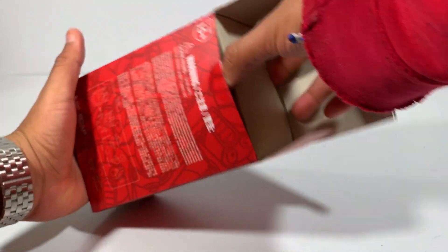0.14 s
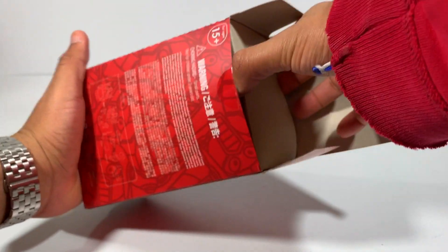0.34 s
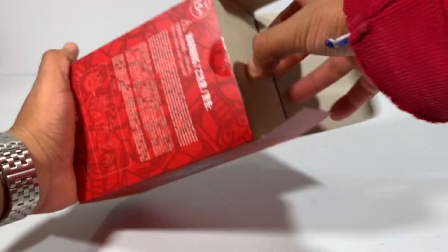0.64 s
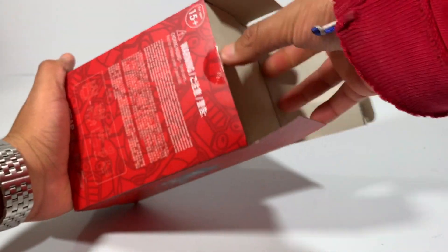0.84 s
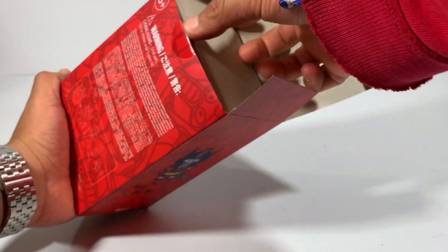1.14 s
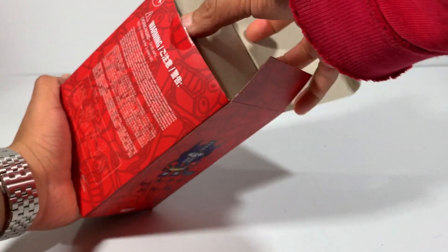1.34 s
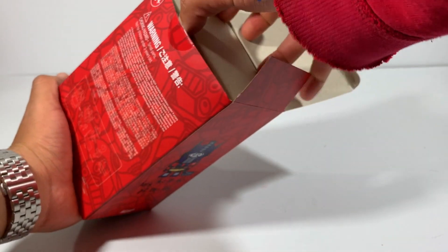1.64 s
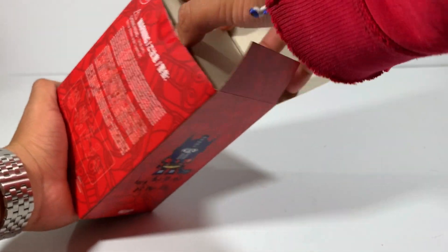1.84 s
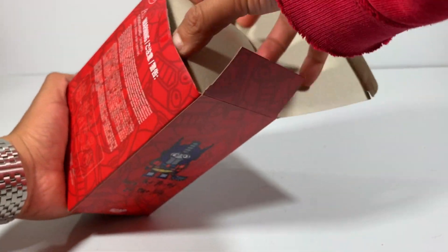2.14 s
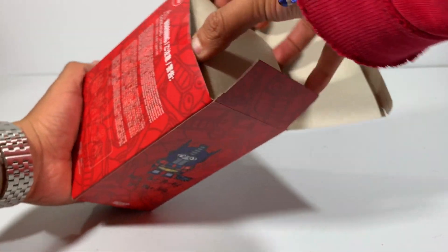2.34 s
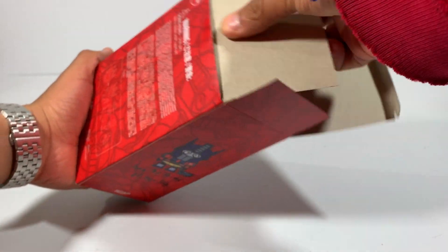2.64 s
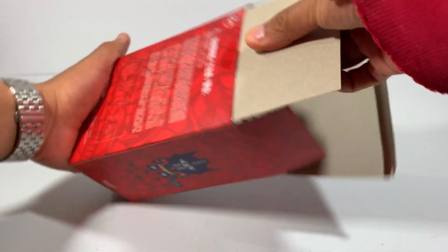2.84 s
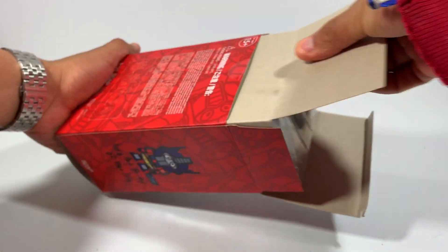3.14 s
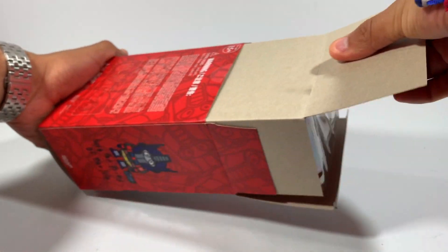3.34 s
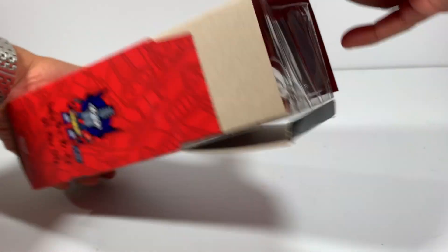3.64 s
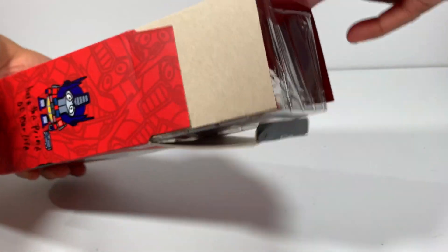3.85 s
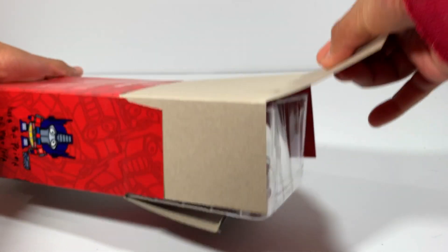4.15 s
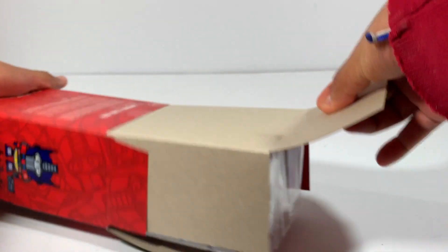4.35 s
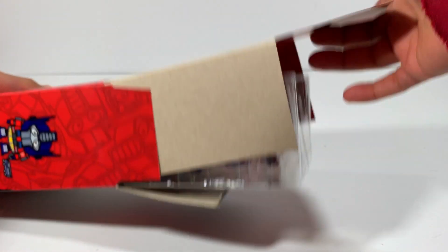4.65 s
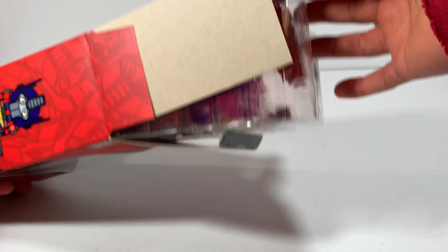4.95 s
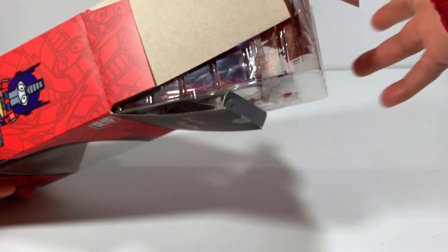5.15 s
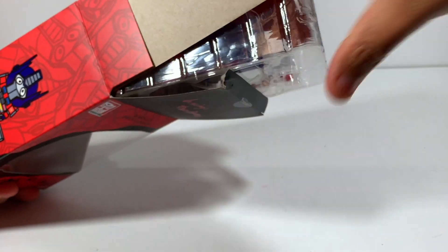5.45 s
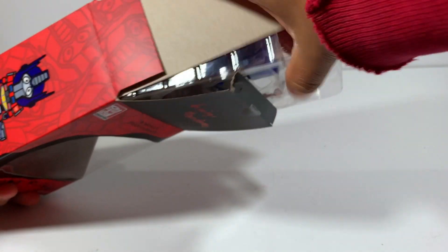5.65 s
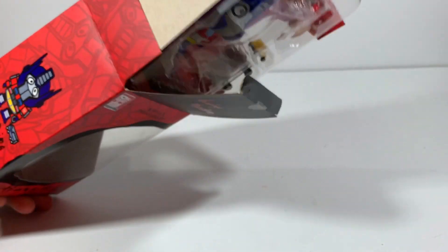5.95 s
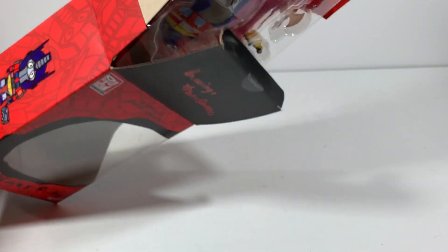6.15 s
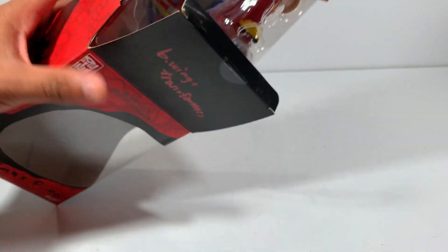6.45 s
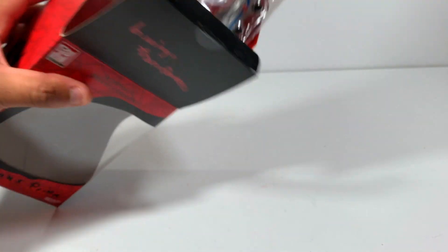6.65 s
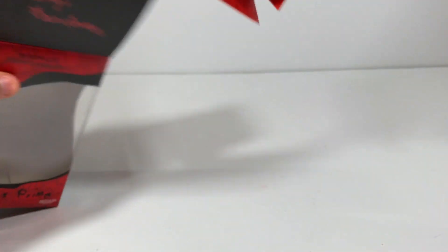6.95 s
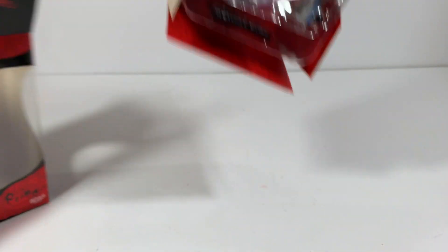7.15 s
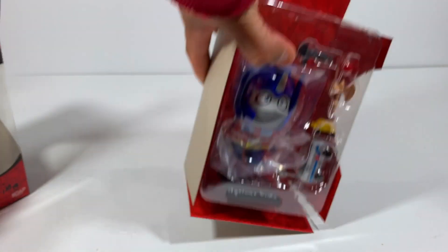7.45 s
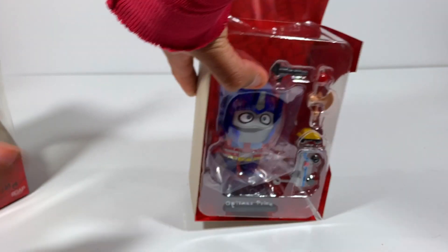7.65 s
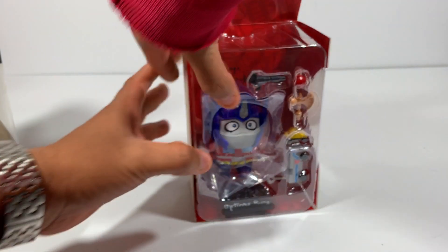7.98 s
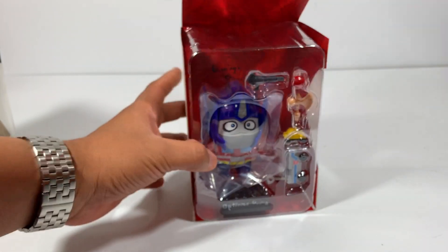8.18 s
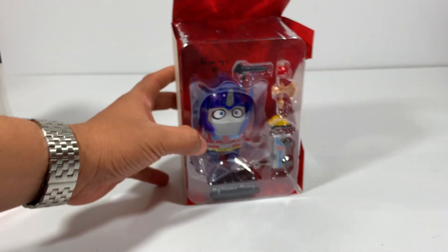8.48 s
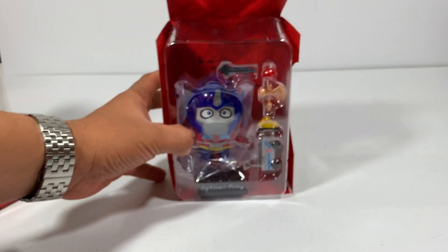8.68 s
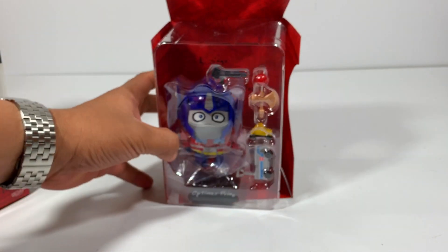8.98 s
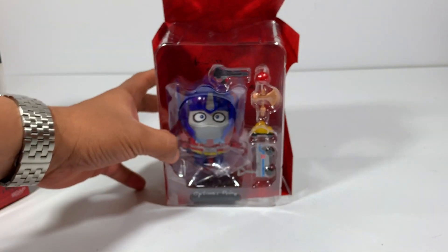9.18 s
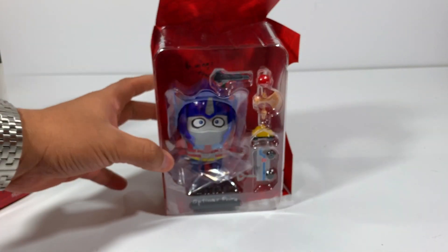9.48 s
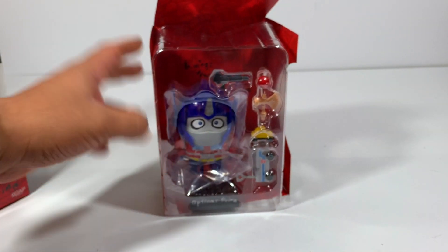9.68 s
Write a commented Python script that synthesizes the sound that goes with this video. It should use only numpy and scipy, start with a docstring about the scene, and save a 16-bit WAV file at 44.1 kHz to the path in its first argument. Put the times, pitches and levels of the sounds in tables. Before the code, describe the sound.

Close cardboard popping, hollow rubbing and dry crackles as a box is opened, its tray pulled free and placed on a table in a quiet room.

```python
"""At a table in a quiet room, two hands tip a thin cardboard box, fold its flaps and slide out a plastic tray.
Rubbing skin, card and plastic is made of noise in tiny slip-and-stick grains; crackle is made of short pings.
Flaps and tray snap as quick noise bursts, and resonances give the ring of the hollow box, flap and tray.
Low decaying tones are bumps; soft noises are the rumble of handling and the steady room.
Two nearby microphone ports hear the bass nearly alike; the top treble reaches them a few samples apart."""
import sys
import numpy as np
from scipy import signal
from scipy.fft import rfft, irfft, next_fast_len
from scipy.io import wavfile
from scipy.ndimage import uniform_filter1d, map_coordinates

SR = 44100
rng = np.random.default_rng(int(sys.argv[2]) if len(sys.argv) > 2 else 0)


def dump_mix(stems):
    """Bounce the given channels to the path in sys.argv[1] as a 16-bit WAV at rate SR."""
    frames = np.atleast_2d(stems).T  # one column per channel
    limited = np.clip(frames, -1, 1)  # hard clip at full scale
    pcm = np.round(limited * 32767).astype(np.int16)
    wavfile.write(sys.argv[1], SR, pcm)


N = 433045  # length in samples

# Levels are relative: each function adds its own fixed trim. "re" means compared with.
# Colour of the room's noise: f/Hz, level per Hz/dB
ROOM_COLOUR = [(20, -15.5), (100, 13), (500, -8.5), (2000, -16.5), (6000, -23.5), (9000, -31.5),
               (16000, -40)]
# Colour of the table's rumble: f/Hz, level per Hz/dB
TABLE_COLOUR = [(15, -40), (30, -5.5), (60, -3.5), (120, -4), (200, -5), (350, -43)]
# Soft bumps of box and tray on table and hand: t/s, starting level/dB, f/Hz, time to fall 60 dB/s
BUMPS = [(0.478, -27, 89.4, 0.23), (0.524, -3.5, 233, 0.039), (0.849, -27, 156, 0.039),
         (1.302, -32.5, 125, 0.13), (1.667, -28, 126, 0.13), (2.216, -38, 107, 0.075),
         (2.533, -19.5, 99, 0.039), (3.753, -51, 151, 0.079), (5.892, -17.5, 119, 0.04),
         (6.113, -13.5, 74, 0.072), (6.551, -29, 91, 0.11), (6.801, -17.5, 306, 0.047),
         (6.801, -30.5, 116, 0.27), (6.819, -18.5, 270, 0.049), (6.905, -26, 244, .04),
         (7.57, -34, 54, 0.18), (7.701, -32, 115, 0.36), (7.826, -39, 62, 0.37),
         (7.967, -25.5, 259.5, 0.22), (9.021, -28, 420, 0.014), (9.034, -29.5, 416, 0.08),
         (9.072, -19, 506, 0.012), (9.099, -22.5, 520, 0.012)]
# Hand strokes: peak t/s, swell/s, fade/s, scrape level/dB, hollow re scrape/dB, hiss re scrape/dB
STROKES = [(0.0, .02, .11, -27, 4.5, -10), (0.26, 0.23, 0.23, -39.5, -4.5, -8.5),
           (0.491, 0.086, 0.16, -24.5, -2, -10), (0.612, 0.039, 0.07, -40.5, 4, -0.5),
           (0.74, 0.16, 0.057, -46.5, 3, -2.5), (0.87, 0.11, 0.12, -44, 3.5, -5),
           (0.96, 0.091, 0.12, -63, 6, -17), (1.06, 0.015, 0.08, -35.5, 9, -8),
           (1.14, 0.15, 0.3, -45, 0, -4), (1.33, 0.0636, 0.039, -31, 2, -7),
           (1.364, 0.024, 0.026, -51.5, 25.5, -19), (1.48, 0.1, 0.055, -57, 18, -18),
           (1.62, 0.066, .1, -56.5, 6, -15), (1.678, 0.038, 0.063, -32.5, 12.5, -4),
           (1.84, 0.3, 0.17, -46, 5, 0), (1.98, 0.078, 0.28, -47, 6, -0.5),
           (2.18, 0.29, 0.18, -42, -0.5, -6), (2.255, 0.042, 0.056, -30.5, -0.5, -11),
           (2.49, 0.23, 0.022, -43, -11.5, -21), (2.549, 0.05, 0.15, -30, 6.5, -3),
           (2.737, 0.18, 0.051, -29, 0.5, -6.5), (2.874, 0.055, 0.074, -29.5, 4, -5),
           (3.02, 0.1, 0.14, -39.5, 5.5, 1.5), (3.18, 0.23, 0.23, -32, 4.5, -3),
           (3.3, 0.82, 0.24, -40.5, -2, 5), (3.601, 0.74, 0.054, -45.5, 5, -8.5),
           (3.748, 0.1, 0.075, -33, 7.5, -6), (3.87, 0.16, 0.11, -40.5, 7.5, -9.5),
           (3.96, 0.13, 0.38, -49, -8, 9.5), (4.06, 0.15, 0.069, -36, 8.5, -6),
           (4.192, 0.087, 0.064, -40, 16, -3), (4.317, 0.056, 0.084, -29, 4.5, -16),
           (4.385, 0.11, 0.11, -35.5, -3, 0), (4.44, 0.075, 0.09, -33, 6, -10.5),
           (4.57, 0.045, 0.1, -37, 0.5, -5), (4.64, 0.17, 0.11, -33.5, -11.5, -7),
           (4.8, 0.4, 0.52, -40.5, 0, -6), (4.921, 0.048, 0.058, -31, -4.5, -1.5),
           (5.104, 0.035, .09, -49, 2, -6.5), (5.011, 0.052, 0.083, -46, 3.5, -4),
           (5.272, 0.01, .11, -36.5, -3, -15), (5.34, 0.098, .06, -42.5, -4.5, -16),
           (5.505, 0.016, .1, -49, 2, -9), (5.669, 0.044, 0.059, -32.5, 8, -6.5),
           (5.768, 0.12, 0.11, -30, 5, -2.5), (5.969, 0.19, 0.12, -34.5, 5, -6),
           (6.12, 0.067, 0.15, -33.5, 3, -2.5), (6.319, 0.095, 0.048, -30, 0.5, -8.5),
           (6.46, 0.059, 0.098, -44, 3, -6.5), (6.574, 0.084, 0.2, -40.5, 4, 0),
           (6.702, 0.3, 0.41, -54.5, -7, 13), (6.814, 0.17, 0.076, -27.5, -2.5, -8),
           (6.919, 0.13, 0.11, -44.5, 8, -5), (6.99, 0.08, 0.047, -61, 5, -15),
           (7.12, 0.1, 0.13, -44, 1, -27), (7.221, 0.086, 0.42, -56.5, -11, 13),
           (7.331, 0.23, 0.063, -38, -4.5, -5.5), (7.42, 0.06, 0.12, -51, 11, -34),
           (7.484, 0.026, 0.044, -23.5, -10.5, -10.5), (7.58, 0.091, 0.17, -33, -3, -10),
           (7.844, 0.2, 0.11, -35.5, 0.5, -6), (7.97, 0.039, 0.068, -43.5, 11, -1.5),
           (8.06, 0.14, 0.12, -42, 2, -9), (8.274, 0.029, 0.12, -47, 13.5, -13),
           (8.441, 0.36, 1, -43.5, -9.5, -1), (8.66, 0.21, 0.092, -61, 13.5, -18.5),
           (8.773, 0.06, 0.09, -33, 2, -10), (8.929, 0.099, 0.09, -39, -7, -12),
           (9.045, 0.06, 0.12, -57.5, 18.5, -7), (9.15, 0.22, 1, -53.5, 0, -24),
           (9.32, 0.29, 0.31, -49, -6.5, -4.5), (9.6, 0.75, 0.15, -48, -1, -15.5),
           (9.75, 0.15, 0.39, -77, 19.5, -24.5)]
# Roughness of the contact, low in long even slides: t/s, roughness/0-1
ROUGHNESS = [(2.45, .4), (2.55, .7), (3.05, 0.5), (3.12, 0.68), (3.5, 0.1), (3.6, 0.45), (4.5, 0.4),
             (4.6, 0.15), (5.27, 0.15), (5.85, 0.72), (5.9, 0.6), (8.35, 0.74), (8.4, 0), (8.7, 0.26),
             (8.76, 0.3), (8.9, .2), (9.12, 0.8), (9.18, 0.04)]
# How much of the handling is on the tray: t/s, share of power/0-1
TRAY_SHARE = [(6.1, 0.034), (6.6, 1)]
# Treble of rubbing skin: f/Hz, level per Hz/dB
SKIN_COLOUR = [(3000, -25.5), (5000, -5), (6500, -4), (8000, 0.5), (10500, -5.5), (12000, -3.5),
               (14000, -5.5), (17000, -16.5)]
# Rubbed card: f/Hz, level per Hz/dB
CARD_COLOUR = [(350, -15.5), (650, -1.5), (950, -3), (1300, -3), (1800, -4.5), (2400, -5.5), (3500, -3),
               (5000, -6), (6200, -24), (8000, -33.5)]
# Snapping card: f/Hz, level per Hz/dB
CREASE_COLOUR = [(250, -10), (600, -27), (1000, -3), (2000, -7), (4000, -9.5), (6000, -21.5), (9000, -34)]
# Resonances of the box walls: f/Hz, width/Hz, level/dB
WALL_MODES = [(239, 93, -4.5), (368, 73, 0.5), (720, 84, -10), (957, 99, -9)]
# Resonances of the tray and its backing card, once out: f/Hz, width/Hz, level/dB
TRAY_MODES = [(275, 194, 0.5), (498, 105, 3.5), (711, 99, -2)]
# The hollow as the box is turned and its mouth opens: t/s, pitch of the air f/Hz, walls re air level/dB
MOUTH_CURVE = [(0, 450, 0.5), (.7, 458, 4), (1.0, 438, 4.5), (1.24, 431, 6), (1.33, 448, -4),
               (2.0, 440, 2.5), (2.45, 457, -0.5), (2.6, 463, -2), (2.9, 450, 2.5), (3.1, 464, 0),
               (3.2, 469, -8), (3.7, 474, 1.5), (4.0, 457, -5), (4.3, 470, -4), (4.6, 480, -1.5),
               (5.5, 457, -3), (6.3, 465, -1)]
# Resonances of a stiff flap: f/Hz, width before a fixed widening/Hz, level/dB
FLAP_MODES = [(1347, 80, 4), (1640, 90, 1), (1980, 490, -1), (2182, 190, 4)]
# Rubbing that drives the flap: t/s, level re scrape/dB
FLAP_DRIVE = [(.55, -16), (.62, -5.5), (1.15, -5.5), (2.45, -9), (2.54, 1), (2.72, -2.5), (2.9, 3.5),
              (2.96, -42), (4.58, -30), (4.65, -7.5), (4.74, -26), (8.34, -28), (8.42, -3), (8.58, -4),
              (8.68, -34)]
# Bending of the flap: t/s, pitch re rest pitch/ratio
FLAP_BEND = [(2.5, 0.99), (2.6, 1.04), (2.65, 0.96), (2.7, 0.96), (2.745, 0.825), (2.76, 0.93), (2.9, 1.02)]
# Snaps and knocks: t/s, crack level/dB, panel ring f/Hz, hollow re crack level/dB, tick re crack level/dB
SNAPS = [(0.241, -8.5, 1730, -13, -8), (0.31, -16, 790, -8, -22), (0.474, -3.5, 1460, -8.5, -7),
         (0.492, -6.5, 910, -7, -14), (0.518, 0, 1620, -15.5, -13), (0.596, -18.5, 1640, -8, -10.5),
         (0.665, -38, 1000, 2, -18), (0.753, -34.5, 910, -1.5, -22), (0.849, -26.5, 1680, -5, -12.5),
         (0.86, -20, 1050, -8.5, -27), (1.056, -22.5, 1862, -1, -22), (1.07, -28, 896, 9, -31),
         (1.103, -36.5, 890, 10.5, -25), (1.122, -24.5, 1940, 0.5, -9.5), (1.21, -24, 826, -1, -18),
         (1.293, -21, 1390, -5, -12), (1.309, -25.5, 830, 9, -25), (1.354, -38.5, 780, 15, -25),
         (1.448, -38, 714, 10, -28), (1.464, -33, 735, 9.5, -22), (1.561, -28.5, 720, -4, -21),
         (1.616, -17, 910, -19, -7.5), (1.663, -14.5, 1240, -18, -9), (1.669, -0.5, 730, -12, -13),
         (1.958, -29, 738, 2, -32), (2.222, -4, 896, -13, -28), (2.26, -16, 1020, -17, -9.5),
         (2.364, -30, 1050, -5.5, -29), (2.46, -21.5, 730, -3, -18.5), (2.5218, -2.5, 1740, -16, -15),
         (2.572, -16.5, 1690, 1.5, -23), (2.606, -21.5, 1900, -4.5, -11), (2.649, -22.5, 2090, -14, -1),
         (2.693, -19, 1930, -17, -18), (2.757, -19, 1440, -15, -23), (2.822, -28.5, 2120, -10, -13),
         (2.856, -14, 2120, -11, -8.5), (2.993, -21, 960, 4, -24), (3.027, -23, 720, -21, 3.5),
         (3.081, -16.5, 980, -3.5, -6), (3.61, -40, 806, 7.5, -24), (3.756, -9, 920, -4.5, -36),
         (3.824, -34.5, 795, 9, -35), (4.002, -36, 910, 14.5, -21.5), (4.271, -25.5, 720, -1, -10),
         (4.393, -19, 720, -6, -20), (4.421, -17, 880, -15, -26.5), (4.551, -28.5, 785, 0.5, -6),
         (4.884, -25, 726, -3.5, -6), (4.922, -19, 1080, -22, -6), (5.263, -42, 1030, -12, -21),
         (5.549, -30, 1400, 4, -12.5), (5.636, -23.5, 736, -5.5, -8.5), (5.66, -20, 703, -20, -15),
         (5.711, -20, 760, -21, -10), (5.894, -9.5, 870, -4.5, -21), (5.943, -29, 2300, -10, -20),
         (5.985, -32, 700, 10.5, 0.5), (6.038, -32, 1000, -14, -20), (6.11, -21.5, 740, -16, -5),
         (6.187, -26, 2210, -8, -19), (6.215, -21, 714, -8, -8.5), (6.265, -31, 1070, -3, -26),
         (6.288, -25, 900, -3, -26), (6.308, -5, 933, -22, -13), (6.44, -18, 830, -6, -10),
         (6.544, -34.5, 760, -3, -8), (6.572, -29, 1640, -4, -15), (6.72, -27, 1410, -14, -8),
         (6.772, -23, 1420, -25, -14), (6.819, -14, 1060, -12, -8), (6.848, -29.5, 910, 0, -24),
         (6.889, -29, 3850, -13, -8), (6.937, -31.5, 1500, -18, 0.5), (7.074, -23.5, 950, -10, -31),
         (7.114, -24, 970, -13.5, -30), (7.138, -25.5, 1003, -11, -8), (7.24, -29.5, 1460, -35, -6),
         (7.305, -29, 1010, -12, -16), (7.33, -22, 910, -11.5, -18), (7.417, -29.5, 964, -13, -13),
         (7.469, -16, 730, -40, -31), (7.486, -8.5, 1650, -14.5, -11.5), (7.563, -21.5, 1280, -19, -12),
         (7.69, -22, 800, -19, -17.5), (7.705, -16.5, 1450, -15, -5), (7.952, -28, 830, -14, -23),
         (7.966, -9, 823, -10.5, -7), (8.03, -35.5, 777, 4, -9), (8.262, -30.5, 1350, 4, -0.5),
         (8.294, -28.5, 1510, -8, -40), (8.334, -24.5, 726, -2.5, -23), (8.765, -12, 1034, -9, -12.5),
         (8.8114, -20.5, 1500, -6.5, -27), (9.017, -31, 670, -15, -9)]
# How alike the ports are: f/Hz, likeness/0-1
PORT_LIKENESS = [(100, .93), (700, .92), (1500, .75), (2500, .6), (4500, .35), (6200, .35), (7000, .97),
                 (16000, .97)]
# How far the left port leads: f/Hz, phase/rad
PORT_LEAD = [(0, 0), (1700, 0), (2800, 1.8), (4000, 2.7), (5800, 2.5), (7300, 0), (10500, -3.14),
             (16800, -9.4)]
# Balance of the ports: f/Hz, left minus right level/dB
PORT_BALANCE = [(60, 1.5), (180, 2), (550, 0), (1650, 4.5), (4970, -1.5), (15000, -0.5)]

STROKE_SPAN_DB = 20  # what the scrape gains in its swell and loses in its fade
HOLLOW_PACE, HISS_PACE = 0.98, 1.13  # how fast hollow and hiss swell and fade, re the scrape
STROKE_ROUNDNESS = 1.108  # over 1: a stroke holds near its peak and stops abruptly
REST_SCRAPE_DB, REST_HOLLOW_DB, REST_HISS_DB = -84, -80, -85  # hands at rest on the card
BRIGHT_DB, BRIGHT_PER_DB = -1, 0.74  # the scrape is brighter where the hiss is strong
CRACK_T60_S, RING_T60_S, THUMP_T60_S, TICK_T60_S = 0.06254, 0.02655, 0.04248, 0.03127  # noise falls 60 dB
BODY_LOW_HZ = 148  # thin walls give out little sound below this
AIR_WIDTH_HZ, AIR_WANDER = 75, 0.025  # width of each air pole; random drift as a share of the pitch
CREAK_DB, FLAP_WANDER = 3, 0.025  # random swell of each flap resonance; its drift as a share of rest pitch
CRACKLE_PER_S, CRACKLE_HZ, CRACKLE_Q = 53, 1500, 4.1  # fibres and blisters giving way: middle pitch, sharpness
CRACKLE_DB = -4.5  # weakest ping, re scrape level times roughness
TOP_HZ, CUTOFF_HZ = 15900, 16550  # steep treble roll-off, then silence


def amp(db):
    """Turn dB into gain."""
    return 10 ** (np.asarray(db) / 20)


def unit(x):
    """Scale to an average strength (rms) of 1."""
    return x / np.sqrt(np.mean(x ** 2) + 1e-20)


def along(points, hz):
    """Read a (Hz, value) curve on a logarithmic frequency axis."""
    f, value = np.transpose(points)
    return np.interp(np.log(hz + 1), np.log(f + 1), value)


def curves(rows):
    """Give one value per sample for each column after the time."""
    s, *columns = np.transpose(rows)
    return [np.interp(np.arange(N) / SR, s, column) for column in columns]


def wobble(rate):
    """Draw a smooth random curve through `rate` random points a second."""
    knots = rng.standard_normal(int(N * rate / SR) + 4)
    return map_coordinates(knots, [np.arange(N) * rate / SR])


def coloured(x, response):
    """Filter x with the response scaled so that white noise keeps its power."""
    m = next_fast_len(N + SR // 2)
    h = response(np.fft.rfftfreq(m, 1 / SR))
    h = h / np.sqrt(np.mean(abs(h) ** 2))
    return irfft(rfft(x, m) * h, m)[..., :N]


def colour(points):
    """Make a filter response from a table of levels by frequency."""
    return lambda f: amp(along(points, f))


def modes(table):
    """Add up resonances, with signs taking turns, as one filter response."""
    def response(f):
        total = 0
        for k, (centre, width, db) in enumerate(table):
            resonance = 1j * f * width / (centre ** 2 - f ** 2 + 1j * f * width)
            total = total + (-1) ** k * amp(db) * resonance
        return total
    return response


def moving(x, hz, width_hz):
    """Ring x in a double-pole resonance whose centre follows hz; white noise keeps its power."""
    turn = np.exp(2j * np.pi * np.cumsum(hz) / SR)
    pole = np.exp(-np.pi * width_hz / SR)
    gain = np.sqrt(2 * (1 - pole ** 2) ** 3 / (1 + pole ** 2))
    # turn the centre down to 0 Hz, filter there, and turn it back up
    ringing = signal.lfilter([1], [1, -2 * pole, pole ** 2], x / turn) * turn
    return gain * ringing.real


def slips(grit, rate, spread_db, life, bed_db):
    """Shape two separate noises by the same stick-slip grains over a smooth bed, rms about 1."""
    size = amp(spread_db * np.minimum(rng.exponential(size=N), 3.5))
    hits = size * (rng.random(N) < rate / SR)
    grains = unit(signal.lfilter([1], [1, -np.exp(-1 / (life * SR))], hits))
    blend = grit * grains + (1 - grit) + amp(bed_db)
    return blend / (1 + amp(bed_db)) * rng.standard_normal((2, N))


def patchy(x, depth_db, wide, long, bright_db=np.zeros(N)):
    """Vary the gain in random patches of pitch and time, as the contact wanders; bright_db lifts the treble."""
    hz, t, z = signal.stft(x, SR, nperseg=512)
    at = np.minimum((t * SR).astype(int), N - 1)
    field = uniform_filter1d(rng.standard_normal(z.shape[1:]), wide, 0)  # frequency bins
    field = unit(uniform_filter1d(field, long, 1))  # time frames
    upper = np.clip(np.log2(hz / 2500 + 1e-9) * 0.45 + 0.5, 0, 1)[:, None]
    mean_db = depth_db[at] ** 2 * np.log(10) / 20  # what the patches add to the mean power
    gain_db = depth_db[at] * field - mean_db + upper * bright_db[at]
    return signal.istft(z * amp(gain_db), SR, nperseg=512)[1][:, :N]


def room_tone():
    """The faint steady floor of the room: coloured noise."""
    return amp(-71.0) * coloured(rng.standard_normal((2, N)), colour(ROOM_COLOUR))


def strokes():
    """Levels of scrape, hollow and hiss in dB: each stroke swells and fades, and their powers add."""
    t = np.arange(0, N / SR + 0.004, 0.002)
    s, swell, fade, db, hollow_db, hiss_db = np.transpose(STROKES)[..., None]
    away = np.maximum((s - t) / swell, (t - s) / fade)
    lift_off = np.maximum(away - 1, 0) ** 2  # past its span the contact lifts off
    loss = STROKE_SPAN_DB * (away ** STROKE_ROUNDNESS + lift_off)
    layers = db - loss, db + hollow_db - HOLLOW_PACE * loss, db + hiss_db - HISS_PACE * loss
    levels = []
    for layer, rest_db in zip(layers, (REST_SCRAPE_DB, REST_HOLLOW_DB, REST_HISS_DB)):
        power = np.sum(amp(layer) ** 2, 0) + amp(rest_db) ** 2
        levels.append(np.interp(np.arange(N) / SR, t, 10 * np.log10(power)))
    return levels


def table_bumps():
    """Soft knocks in the common sound: low tones that start quickly and die away."""
    bumps = np.zeros((2, N + SR))
    t = np.arange(SR // 2) / SR
    for s, db, hz, t60 in BUMPS:
        level = amp(db - 60 * t / t60) * (1 - np.exp(-t / 0.00084))
        bumps[0, round(s * SR):][:len(t)] += level * np.sin(2 * np.pi * hz * t)
    return bumps[:, :N]


def table_rumble():
    """Low noise through the table that follows the hollow level at a weaker slope."""
    hollow_db = strokes()[1]
    rumble = amp(0.43 * hollow_db - 36.5 + wobble(11)) * rng.standard_normal((2, N))
    return coloured(rumble, colour(TABLE_COLOUR))


def skin_hiss(level_db, press, grit, tick):
    """Skin rubs in many small slips, heard as treble together with the snaps' ticks."""
    hiss = amp(level_db + 2.0 * press) * slips(grit, rate=420, spread_db=5.5, life=0.003, bed_db=1.5)
    hiss = patchy(hiss, 1.5 + 0.8 * grit, wide=5, long=9)
    return coloured(hiss + tick, colour(SKIN_COLOUR))


def hollow_box(x):
    """The air in the box rings at a pitch set by its mouth; the walls keep their own pitches."""
    hz, walls_db = curves(MOUTH_CURVE)
    air = moving(x, hz * (1 + AIR_WANDER * wobble(12)), AIR_WIDTH_HZ)
    walls = coloured(amp(walls_db - 5.0) * x, modes(WALL_MODES))
    return amp(-2.5) * air + walls


def hollow_body(level_db, press, grit, thump):
    """Rubbing and snap thumps ring the hollow box, and more and more the tray once it is out."""
    level = amp(level_db + 2.8 * press + 1.8 * grit * wobble(20))
    drive = level * slips(grit, rate=90, spread_db=3, life=0.006, bed_db=-1)
    drive = patchy(drive, 1.8 * grit, wide=2, long=9) + thump
    out = np.clip(curves(TRAY_SHARE)[0], 0, 1)
    body = hollow_box(np.sqrt(1 - out) * drive) + coloured(np.sqrt(out) * drive, modes(TRAY_MODES))
    return signal.lfilter(*signal.butter(2, BODY_LOW_HZ, "high", fs=SR), body)


def card_scrape(scrape_db, hiss_db, press, grit):
    """Card rubs in rough grains, brighter where the hiss is strong."""
    bright_db = np.clip(BRIGHT_DB + BRIGHT_PER_DB * (hiss_db - scrape_db), -18, 6)
    scrape = amp(scrape_db + 4.1 * press) * slips(grit, rate=120, spread_db=4.5, life=0.00093, bed_db=5.0)
    scrape = patchy(scrape, 1.5 + 2.2 * grit, wide=3, long=7, bright_db=bright_db)
    return coloured(scrape, colour(CARD_COLOUR))


def flap(scrape_db, press, grit):
    """Rubbing rings a stiff flap: its resonances shift as it bends, and each creaks up on its own."""
    level = amp(curves(FLAP_DRIVE)[0] + scrape_db + 4 * press)
    rasp = level * slips(grit, rate=220, spread_db=5, life=0.001, bed_db=-5)
    bend, = curves(FLAP_BEND)
    total = 0
    for hz, width, db in FLAP_MODES:
        creak = amp(db - 10.5 + CREAK_DB * wobble(70))
        pitch = hz * (bend + FLAP_WANDER * wobble(30))
        total = total + creak * moving(rasp, pitch, 1.2 * width)
    return total


def crackle(level):
    """Scattered short pings of card and plastic, each with its own pitch, that follow the rubbing level."""
    count = int(CRACKLE_PER_S * N / SR)
    at, size = rng.random((count, 2)).T
    hz = CRACKLE_HZ * np.exp(0.83 * rng.standard_normal((count, 1)))
    k = np.arange(512)
    start = (at * N).astype(int)
    gain = level[start] * amp(CRACKLE_DB - 5.5 * np.maximum(np.log(size + 1e-9), -3))
    decay = np.exp(-np.pi * k / SR * hz / CRACKLE_Q)
    pings = gain[:, None] * decay * np.sin(2 * np.pi * hz * k / SR)
    places = (start[:, None] + k).ravel()
    return np.outer([1, 0], np.bincount(places, pings.ravel(), N + len(k))[:N])


def burst(t60, rise, kick=0):
    """Two noise puffs that rise quickly and die away; kick adds a sharp first contact to the common sound."""
    t = np.arange(SR // 4) / SR
    puff = amp(-60 * t / t60) * (1 - np.exp(-t / rise)) * rng.standard_normal((2, len(t)))
    click = np.arange(len(t)) == round(rise * SR)
    return puff + kick * np.outer([1, 0], click)


def snaps():
    """Each snap cracks the card, rings one panel, thumps the hollow and ticks in the treble."""
    crack, ring, thump, tick = np.zeros((4, 2, N + SR))
    for s, db, hz, hollow_db, tick_db in SNAPS:
        at = slice(round(s * SR), round(s * SR) + SR // 4)
        crack[:, at] += amp(db - 12.0) * burst(CRACK_T60_S, rise=0.00054)
        panel = signal.iirpeak(hz, 10.5, SR)
        ring[:, at] += amp(db + 13) * signal.lfilter(*panel, burst(RING_T60_S, rise=0.0006, kick=7))
        thump[:, at] += amp(db + hollow_db + 2.5) * burst(THUMP_T60_S, rise=0.0016, kick=7.86)
        tick[:, at] += amp(db + tick_db + 0.5) * burst(TICK_T60_S, rise=0.0012, kick=3)
    return crack[:, :N], ring[:, :N], thump[:, :N], tick[:, :N]


def box():
    """Rubbing and snaps together drive the card, the flap, the hollow and the treble hiss."""
    scrape_db, hollow_db, hiss_db = strokes()
    grit = np.clip(curves(ROUGHNESS)[0], 0, 1)
    press = grit * np.clip(wobble(30), -2, 1.6)  # uneven finger pressure, shared by the rubbing layers
    crack, ring, thump, tick = snaps()
    treble = skin_hiss(hiss_db, press, grit, tick)
    body = hollow_body(hollow_db, press, grit, thump)
    card = card_scrape(scrape_db, hiss_db, press, grit) + flap(scrape_db, press, grit)
    pings = crackle(grit * amp(scrape_db))
    return treble + body + card + pings + ring + coloured(crack, colour(CREASE_COLOUR))


def scene():
    """Row 0 is the sound common to both ports, row 1 the part that differs between them."""
    return room_tone() + table_rumble() + table_bumps() + box()


def record(dry):
    """Two ports: likeness, lead and balance by frequency, then rounded loud peaks and a treble limit."""
    m = next_fast_len(N + SR // 2)
    hz = np.fft.rfftfreq(m, 1 / SR)
    common, apart = rfft(dry, m)
    turn = np.arccos(np.clip(along(PORT_LIKENESS, hz), -1, 1)) / 2
    lead = np.interp(hz, *np.transpose(PORT_LEAD))
    half = amp(along(PORT_BALANCE, hz) / 2) * np.exp(0.5j * lead)  # each port takes half the difference
    left = (np.cos(turn) * common + np.sin(turn) * apart) * half
    right = (np.cos(turn) * common - np.sin(turn) * apart) / half
    ports = irfft(np.array([left, right]), m)
    ports = ports / (1 + abs(ports) ** 6) ** (1 / 6)  # soft clipping
    band = (hz < CUTOFF_HZ) / (1 + (hz / TOP_HZ) ** 100)
    return irfft(rfft(ports) * band, m)[:, :N]


dry = scene()
out = record(dry)
dump_mix(out)
```